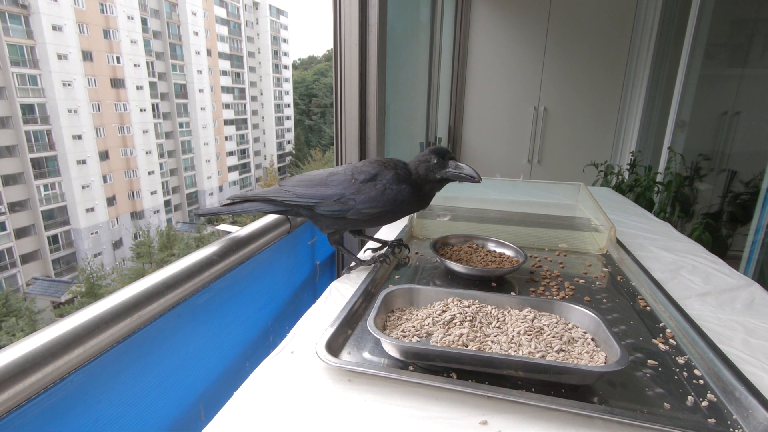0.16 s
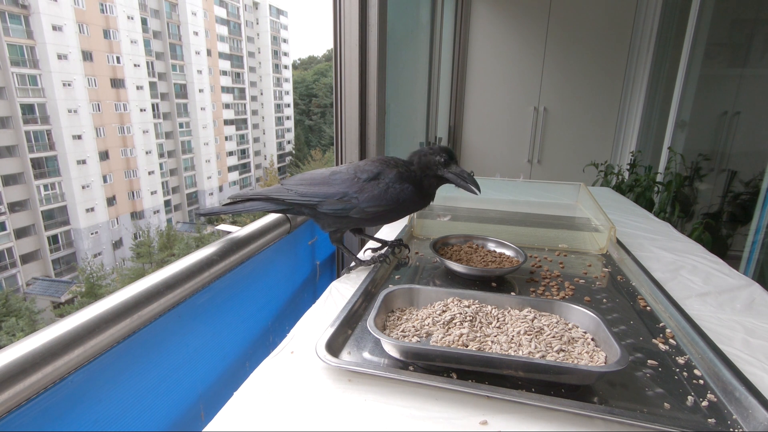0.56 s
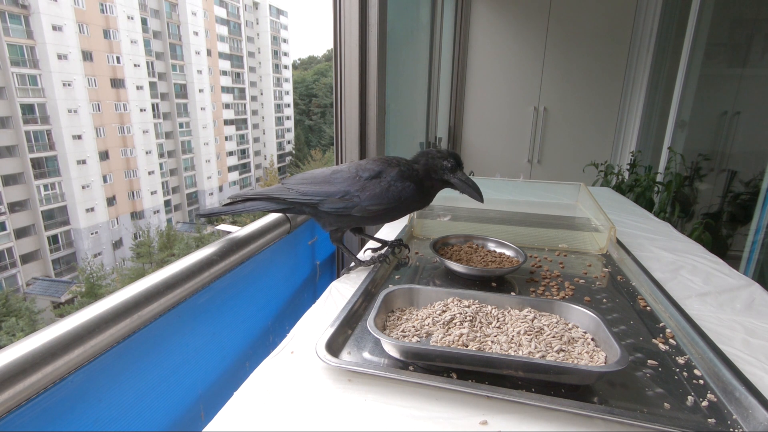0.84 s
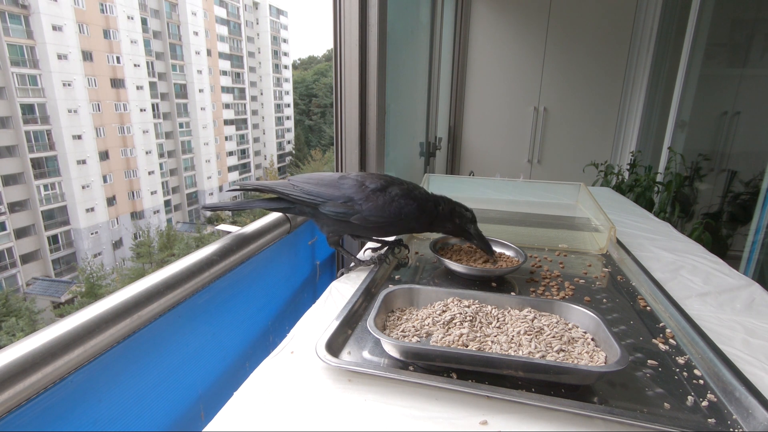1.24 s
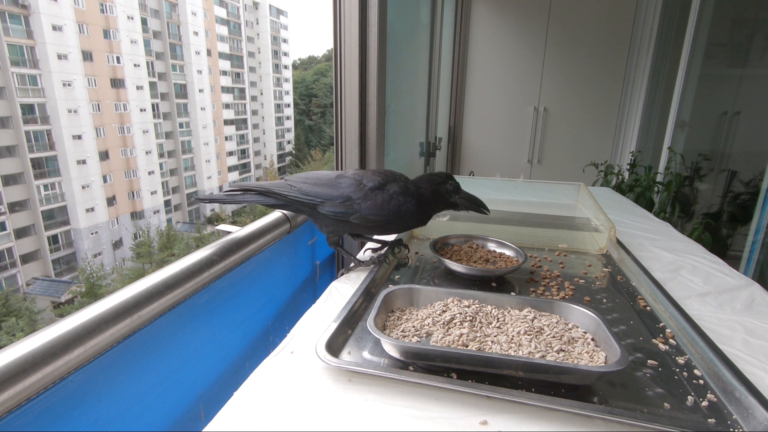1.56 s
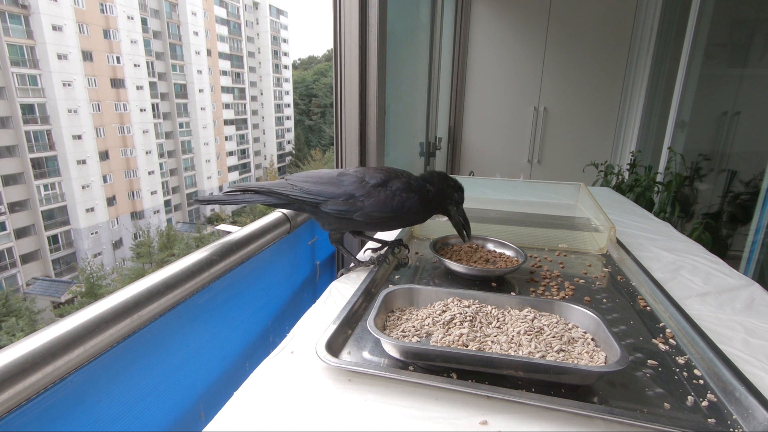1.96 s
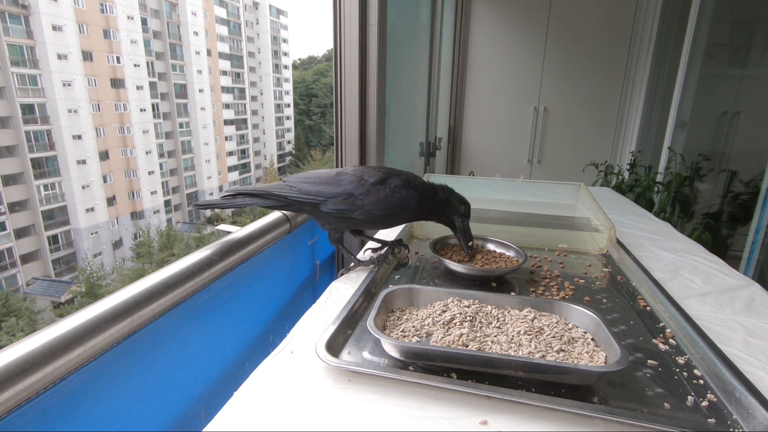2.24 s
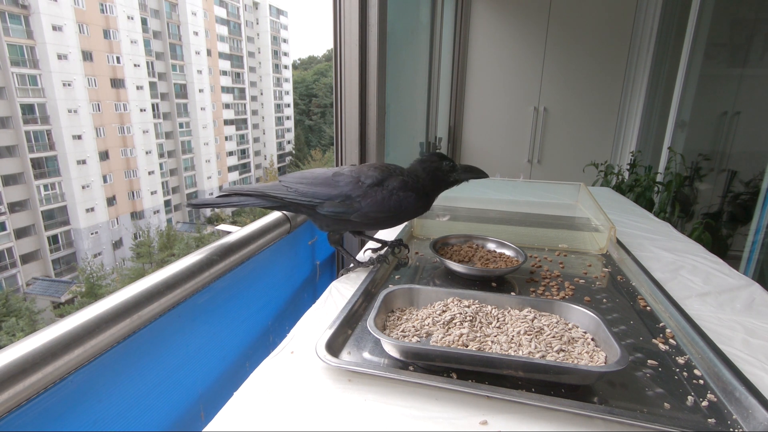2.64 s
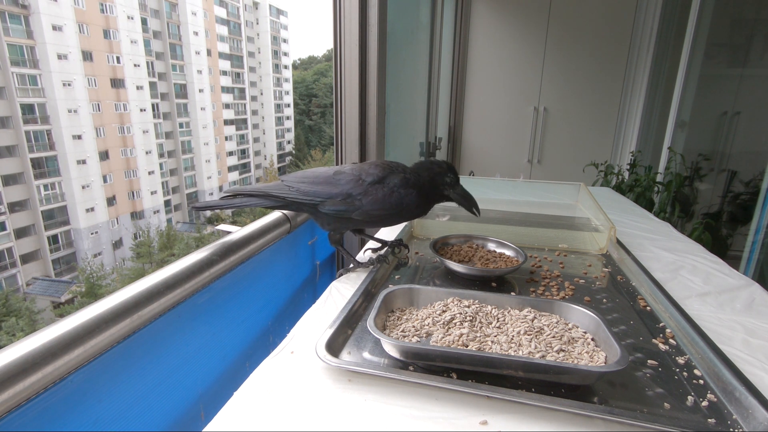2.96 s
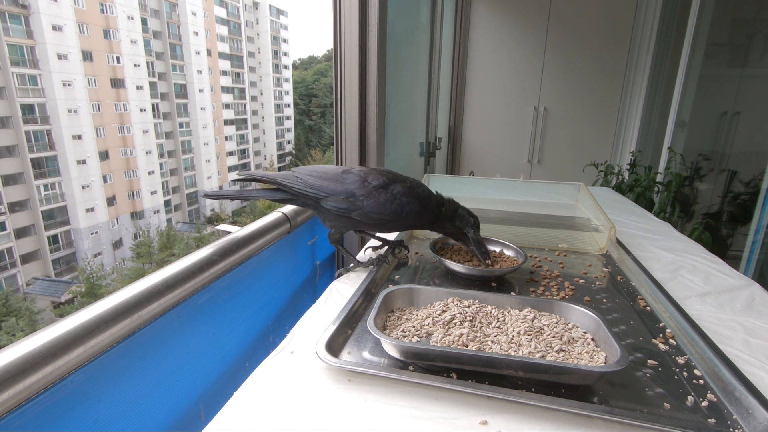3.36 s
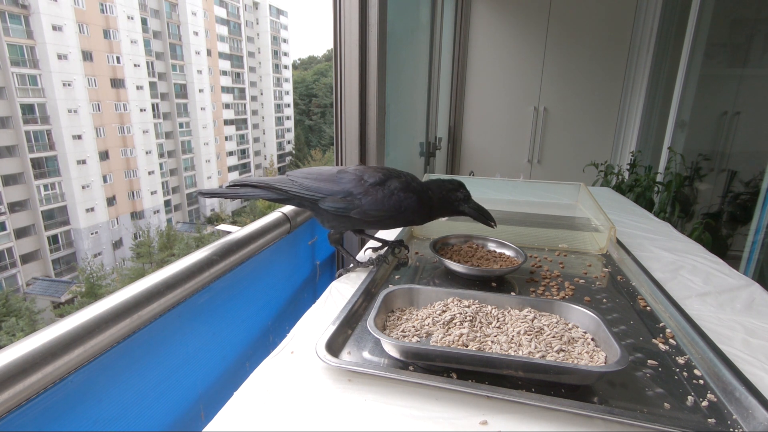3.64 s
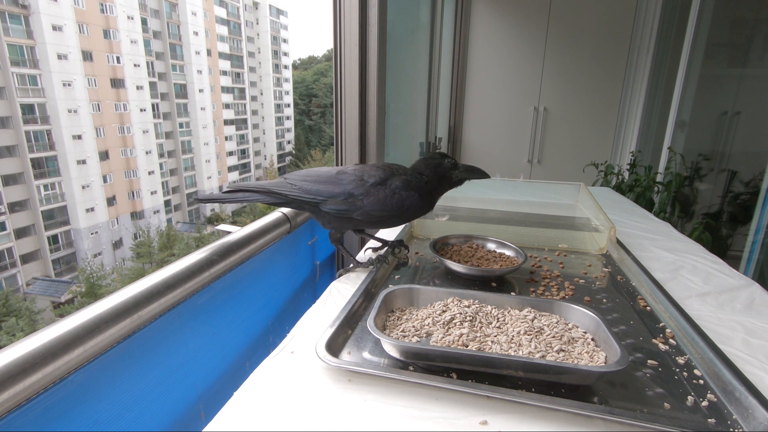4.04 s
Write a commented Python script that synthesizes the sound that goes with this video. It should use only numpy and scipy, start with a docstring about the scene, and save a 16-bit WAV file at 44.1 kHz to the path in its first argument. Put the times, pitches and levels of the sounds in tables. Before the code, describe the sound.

A crow feeds from a steel bowl on a glazed balcony. After a tap on the railing come three short bursts of pecking, with crisp bill clicks, rattling seeds and a thin metallic ring. One sharp, buzzing crack on the railing follows, then lighter clicks and soft thumps from a tray. Distant traffic, a low hum and light wind on the nearby microphone run underneath.

```python
"""Crow at a steel seed bowl

On a glazed balcony a crow's bill stirs seeds, clicks, rings the bowl and cracks on the railing,
which buzzes; glass and walls echo, and the pushed tray thumps. Behind: city traffic, three low
wavering hums, wind at the two microphone ports. The camera housing adds a treble peak between notches."""
import sys
import numpy as np
from scipy import signal
from scipy.fft import rfft, irfft, next_fast_len
from scipy.io import wavfile
from scipy.ndimage import uniform_filter1d, map_coordinates

SR = 44100
rng = np.random.default_rng(int(sys.argv[2]) if len(sys.argv) > 2 else 0)


def to_wav(sig):
    """Store sig (one row per channel, or 1-D mono) as 16-bit WAV at the path in sys.argv[1].

    Samples outside -1..1 are clipped; the rate is SR.
    """
    pcm = np.clip(np.atleast_2d(sig), -1, 1) * 32767
    pcm = np.round(pcm).astype(np.int16)
    wavfile.write(sys.argv[1], SR, pcm.T)  # frames by channels


N = 185543
TIME_S = np.arange(N) / SR

# camera housing response: (frequency [Hz], gain [dB])
HOUSING_GAIN = [(3000, -0.5), (3900, -4), (4350, -21.5), (4800, -4.5), (6000, 11), (7300, 2.5), (8100, -15),
                (8800, -40.5), (9600, -11.5), (12000, -14), (13000, -39), (14000, -24), (15000, -48.5)]
# glass echo of bill and seeds: (frequency [Hz], gain [dB])
GLASS_GAIN = [(400, -27), (1100, -10), (2200, 5.5), (3800, -5), (6000, -10), (12000, -18.5)]
# taps on the railing: (time [s], crack [dB], crack pitch [ratio], loss below mid pitch [dB/oct],
# loss above [dB/oct], pan [dB], buzz pitch [ratio], buzz t60 [s], buzz [dB], rattle [dB], seed jolt [dB])
TAPS = [(0.0857, -30, 1.145, 1.5, 0, -1, 0.89, 0.18, -35.5, -50, -63.5),
        (2.5375, -41, 0.88, -3, 12, 0.5, .8, 0.089, -43, -74, -87),
        (3.3835, -18.5, 1.012, 3, 5, -2, 0.91, 0.11, -28.5, -48, -50.5),
        (3.8882, -41, 1.0, -3, 1.5, -4, 0.87, 0.085, -40.5, -64.5, -79.5)]


def amp(db):
    return 10 ** (np.asarray(db) / 20)


def unit(x):
    return x / np.sqrt(np.mean(x ** 2) + 1e-20)


def pan(db):
    """Stereo gains for a left-minus-right level."""
    return amp(db * np.array([[.5], [-.5]]))


def along(points, hz):
    """Interpolate (Hz, value) points on a log axis."""
    f, v = np.transpose(points)
    return np.interp(np.log(hz + 1), np.log(f + 1), v)


def curves(rows):
    """One value per sample for each column after the time."""
    s, *cols = np.transpose(rows)
    return [np.interp(TIME_S, s, c) for c in cols]


def wobble(rate_hz):
    """Smooth random curve, rate_hz knots a second."""
    return map_coordinates(rng.standard_normal(int(N * rate_hz / SR) + 4), [TIME_S * rate_hz])


def burst(hz, cycles, t):
    """Sine that falls to 1/e in the given cycles."""
    return np.sin(2 * np.pi * hz * t) * np.exp(-t * hz / cycles)


def filtered(x, response, ends="odd"):
    """Apply response(hz); mirrored ends avoid clicks."""
    edge = SR // 4
    x = np.pad(x, [(0, 0)] * (x.ndim - 1) + [(edge, edge)], "reflect", reflect_type=ends)
    m = next_fast_len(x.shape[-1])
    return irfft(rfft(x, m) * response(np.fft.rfftfreq(m, 1 / SR)), m)[..., edge:edge + N]


def shaped(x, spectrum, ends="odd"):
    """Filter by (Hz, dB) points."""
    return filtered(x, lambda hz: amp(along(spectrum, hz)), ends)


def two_ports(three, shared):
    """One common signal with the given share of power, plus one per port."""
    return np.sqrt(shared) * three[0] + np.sqrt(1 - shared) * three[1:]


def port_phase(x, lead):
    """Each port hears each frequency with its own phase."""
    return filtered(x, lambda hz: np.exp(.5j * along(lead, hz) * np.array([[1], [-1]])))


def rush(spectrum, patchy_db):
    """Stereo noise, rms 1, with random gain patches in time and frequency."""
    # (frequency [Hz], left-right correlation [ratio])
    coherence = [(60, 0.95), (140, 0.82), (280, 0.43), (500, 0.47), (900, 0.71), (1850, 0.76), (3600, 0.73),
                 (5500, 0.091), (12000, 0.076)]
    z = signal.stft(rng.standard_normal((2, N + 512)), nperseg=512)[2]
    patches = uniform_filter1d(rng.standard_normal(z.shape[1:]), size=6, axis=0)
    patches = unit(uniform_filter1d(patches, size=14, axis=1))
    pair = signal.istft(z * amp(patchy_db * patches), nperseg=512)[1][:, :N]

    def mid_side_gain(hz):
        angle = np.arccos(along(coherence, hz)) / 2
        return amp(along(spectrum, hz)) * [np.cos(angle), np.sin(angle)]

    mid, side = filtered(pair, mid_side_gain, ends="even")
    return unit(np.array([mid + side, mid - side]))


def hums():
    """Three low sines wandering in pitch and level."""
    # level of each hum: (time [s], level [dB])
    deep_level = [(0.0, -29.5), (0.2, -26), (0.22, -31.5), (0.33, -27.5), (0.62, -33), (0.67, -41),
                  (0.77, -34), (1.08, -30.5), (1.21, -36.5), (1.56, -26), (1.77, -34), (1.83, -24),
                  (1.97, -33.5), (2.0, -37.5), (2.46, -24.5), (2.51, -32), (3.1, -25.5), (3.21, -36.5),
                  (3.34, -24.5), (3.57, -30.5), (3.76, -28.5), (4.04, -30.5), (4.17, -28.5), (4.21, -28)]
    middle_level = [(0.0, -24), (0.13, -56), (0.26, -17.5), (0.29, -51.5), (0.34, -19.5), (0.5, -49),
                    (0.6, -33), (0.87, -43.5), (0.91, -32.5), (1.26, -55.5), (1.4, -24.5), (1.52, -34),
                    (1.63, -20), (1.76, -46), (1.85, -22), (2.04, -56), (2.08, -35), (2.58, -48.5),
                    (2.62, -27.5), (2.69, -41.5), (3.15, -43.5), (3.17, -32.5), (3.49, -50), (3.77, -24),
                    (3.79, -53.5), (4.21, -37.5)]
    upper_level = [(0, -51.5), (.8, -43.5), (1.8, -54.5), (2.5, -46), (2.7, -43.5), (3.2, -38.5),
                   (4.0, -48.5), (4.21, -35)]
    # (time [s], pitch [Hz])
    middle_pitch = [(0, 54.05), (.45, 54.37), (.6, 60.65), (1.3, 60.37), (1.6, 62.52), (1.9, 63.18),
                    (2.8, 61.32), (3.2, 65.84), (3.6, 55.2), (4.21, 54.16)]
    deep_hz, middle_hz, upper_hz = 25.46, curves(middle_pitch)[0], 150.5
    drift, waver_db = 0.0244, 1.5
    out = 0
    for hz, level in ((deep_hz, deep_level), (middle_hz, middle_level), (upper_hz, upper_level)):
        turns = np.cumsum(hz * (1 + drift * wobble(5))) / SR + rng.random()
        rms = amp(curves(level)[0] + waver_db * wobble(11))
        out = out + np.sqrt(2) * rms * np.sin(2 * np.pi * turns)
    return out


def wind():
    """Gusts buffet the ports with low noise."""
    # (time [s], level [dB])
    gusts = [(0.0, -56), (0.14, -35.5), (0.3, -26), (0.53, -41), (0.6, -26), (0.66, -37), (1.8, -31.5),
             (1.86, -26), (2.27, -40), (2.99, -33), (3.07, -54), (3.22, -20.5), (3.3, -45), (3.53, -53),
             (3.76, -27.5), (3.78, -29.5), (3.99, -32), (4.21, -46.5)]
    # (frequency [Hz], density [dB])
    spectrum = [(18, -43), (30, 5.5), (41, -2.5), (65, -1), (97, -6.5), (160, -14.5), (210, -12.5),
                (350, -120)]
    gust_db = curves(gusts)[0] + 1.5 * wobble(8)
    return amp(gust_db) * rush(spectrum, patchy_db=0)


def traffic():
    """Low roar and broad hiss from the street."""
    # (time [s], roar [dB], hiss [dB])
    levels = [(0.0, -37.5, -49.5), (0.3, -39, -49), (0.34, -32.5, -48.5), (0.56, -41, -50),
              (1.01, -36, -49.5), (1.05, -38.5, -49), (2.46, -36.5, -49.5), (2.49, -40, -47),
              (2.79, -36, -48), (4.21, -38.5, -48)]
    # spectra: (frequency [Hz], density [dB])
    roar = [(53, -33.5), (90, -2), (118, -8.5), (140, -5.5), (193, -2.5), (333, -12.5), (367, -15.5),
            (394, -17), (600, -46), (780, -56.5), (1320, -120)]
    hiss = [(300, -11.5), (450, 5.5), (750, 5), (1400, -1.5), (2200, -12), (3500, -22), (6000, -29),
            (10000, -27.5), (16000, -21.5)]
    roar_db, hiss_db = curves(levels)
    return amp(roar_db) * rush(roar, patchy_db=1.5) + amp(hiss_db) * rush(hiss, patchy_db=1.68)


def background():
    """Hums, wind and traffic, stronger on the right."""
    # (frequency [Hz], left minus right [dB])
    balance = [(60, -4), (170, -5), (330, -1.5), (510, -0.5), (860, -4), (1470, -1), (2200, -1.5),
               (7300, -2)]
    return filtered(hums() + wind() + traffic(), lambda hz: pan(along(balance, hz)))


def puffs():
    """Short octave-wide swells of turbulence, mostly at the left port."""
    # (time [s], half-width [s], level [dB], centre [Hz])
    swells = [(0.279, 0.012, -50, 630), (0.321, 0.0098, -49, 725), (0.335, 0.047, -50.5, 690),
              (0.374, 0.021, -51, 744)]
    out = np.zeros(N)
    for s, width_s, db, centre_hz in swells:
        band = lambda hz: np.exp(-(np.log2((hz + 1) / centre_hz) / 0.63) ** 2)
        eddy = unit(filtered(rng.standard_normal(N), band, ends="even"))
        out += amp(db) * np.exp(-((TIME_S - s) / width_s) ** 2) * eddy
    return out * pan(5)


def glazing(x, colour):
    """Strong, dull first echo off the glass, slightly later on the left."""
    delay_s = .0055 + .0001 * np.array([[.5], [-.5]])
    return filtered(x, lambda hz: amp(along(colour, hz)) * np.exp(-2j * np.pi * hz * delay_s))


def balcony(x):
    """Direct sound, wall echoes and a noise tail redrawn every quarter second."""
    # (delay [s], gain [dB])
    walls = [(.008, -21.5), (0.014, -35.5), (0.022, -29.5), (0.027, -34)]
    # (frequency [Hz], t60 [s])
    decay = [(300, 0.57), (1500, 0.35), (4000, 0.075), (10000, 0.22)]
    step, tail_delay_samples, tail_db = SR // 4, 300, -10
    out = x.copy()
    for s, db in walls:
        out[:, round(s * SR):] += amp(db) * x[:, :-round(s * SR)]
    for start in range(0, N, step):
        hz, t, z = signal.stft(rng.standard_normal((2, SR // 2)), SR, nperseg=256)
        tail = signal.istft(z * amp(-60 * t / along(decay, hz)[:, None]), SR, nperseg=256)[1]
        wet = signal.fftconvolve(x[:, start:start + step], tail / np.linalg.norm(tail[0]), axes=1)
        room = out[:, start + tail_delay_samples:]
        room[:, :wet.shape[1]] += amp(tail_db) * wet[:, :room.shape[1]]
    return out


def tray_thumps():
    """The pushed tray gives short low pulses."""
    # (time [s], half-width [s], level [dB], pitch [Hz])
    pushes = [(3.224, 0.0087, -19, 126), (3.702, 0.0055, -19.5, 95), (3.917, 0.0029, -21, 122)]
    out = np.zeros(N)
    for s, width_s, db, hz in pushes:
        t = TIME_S - s
        out += amp(db) * np.exp(-(t / width_s) ** 2) * np.cos(2 * np.pi * hz * t)
    return out * pan(5)


def husk_splash():
    """Husks thrown against the steel: fine bright grains, unrelated at the two ports."""
    # (time [s], level [dB], t60 [s])
    throws = [(1.09, -74, 0.24), (1.19, -52, .2), (2.081, -68, 0.29), (2.286, -59, 0.27), (3.2, -58, 0.34),
              (3.3, -63, .5), (3.38, -38.5, 0.22), (3.885, -70, 0.14)]
    # (frequency [Hz], density [dB])
    spectrum = [(8000, -42), (9500, 4.5), (12000, 9.5), (14000, 5.5), (16000, -12.5)]
    grains_per_s, rise_s = 5000, 0.0033
    grains = (rng.random((2, N)) < grains_per_s / SR) * rng.standard_normal((2, N))
    envelope = np.zeros(N)
    for s, db, t60 in throws:
        age = np.maximum(TIME_S - s, 0)
        envelope += amp(db - 60 * age / t60) * (1 - np.exp(-age / rise_s))
    return envelope * pan(-3) * unit(shaped(grains, spectrum, ends="even"))


def collisions(per_s, spread_db, shared):
    """Random stereo impulses of uneven size."""
    hits = (rng.random((3, N)) < per_s / SR) * rng.standard_normal((3, N))
    size_db = spread_db * np.minimum(rng.exponential(size=(3, N)), 4)
    return two_ports(hits * amp(size_db), shared)


def seeds():
    """Seeds collide, dull bodies and bright husks; each stir or rail jolt rises, holds and settles."""
    # (start [s], hold [s], level [dB], brightness [dB])
    stirs = [(0.785, 0.11, -74, 3.5), (1.062, 0.008, -62.5, -0.5), (1.076, 0.012, -59, -1.5),
             (1.103, 0.018, -58, -1.5), (1.161, 0.072, -60, -2.5), (2.03, 0.047, -56.5, -7),
             (2.076, 0.013, -54.5, 0), (2.083, 0.0067, -55.5, 3.5), (2.186, 0.011, -63, 4.5),
             (2.282, 0.01, -68, 11), (2.322, 0.012, -63, 1.5), (2.446, 0.009, -67.5, 0),
             (2.493, 0.036, -74, -11.5), (3.12, 0.0085, -67, 7), (3.174, .02, -62, -1),
             (3.196, 0.0087, -56.5, 2), (3.21, 0.016, -53, -4), (3.256, 0.013, -64, -0.5),
             (3.3, 0.0067, -55.5, 6), (3.852, 0.012, -75, 7.5), (3.877, 0.0056, -63, 1),
             (4.005, 0.019, -69, -17)]
    # (frequency [Hz], density [dB])
    body_spectrum = [(500, -5), (1200, 2), (2000, 1.5), (3000, -1), (4000, -1.5), (4600, -14.5)]
    husk_spectrum = [(3500, -16.5), (4500, 4.5), (6000, -0.5), (8000, 10.5), (9500, -0.5), (12000, -6.5),
                     (16000, 4.5)]
    attack_s, settle_db_per_s = 0.0019, 206.5
    rest_db, rest_bright_db = -87.5, -13.5
    jolt_hold_s, jolt_bright_db = 0.024, 8
    coarse = collisions(per_s=1700, spread_db=2.9, shared=0.49)
    fine = collisions(per_s=9000, spread_db=4.0, shared=0.41)
    body = unit(shaped(coarse, body_spectrum))
    husk = unit(shaped(fine + 0.12 * coarse, husk_spectrum))
    out = amp(rest_db) * (body + amp(rest_bright_db) * husk)
    jolts = [(s, jolt_hold_s, db, jolt_bright_db) for s, *_, db in TAPS]
    for s, hold_s, db, bright_db in stirs + jolts:
        at = slice(round(s * SR), round(s * SR) + SR // 2)
        age = TIME_S[at] - at.start / SR
        rise = np.clip(age / attack_s, 0, 1) ** 2
        settle_db = settle_db_per_s * np.maximum(age - attack_s - hold_s, 0)
        out[:, at] += rise * amp(db - settle_db) * (body[:, at] + amp(bright_db) * husk[:, at])
    return out


def resonant_noise(modes, pitch):
    """Stereo noise through the rail's resonances, rms 1."""
    noise = two_ports(rng.standard_normal((3, N)), shared=0.7)
    peaks = lambda f: sum(amp(db) / (1 + ((f / pitch - hz) / width) ** 2) for hz, width, db in modes)
    return unit(filtered(noise, peaks, ends="even"))


def rail_buzz():
    """The loose rail buzzes and rattles; the buzz pitch depends on the place of the tap."""
    # (base frequency [Hz], half-width [Hz], level [dB]); the last row rattles
    modes = [(724, 840, -13.5), (1120, 540, -11), (1480, 120, 1), (1800, 200, -7), (4100, 880, 0)]
    lag_s, rise_s, rattle_t60_s = 0.0019, 0.00057, .4
    out = np.zeros((2, N))
    rattle_noise = resonant_noise(modes[-1:], pitch=0.93)
    for s, *_, pitch, t60, buzz_db, rattle_db, _ in TAPS:
        age = np.maximum(TIME_S - s - lag_s, 0)
        buzz = amp(buzz_db - 60 * age / t60) * resonant_noise(modes[:-1], pitch)
        rattle = amp(rattle_db - 60 * age / rattle_t60_s) * rattle_noise
        out += (1 - np.exp(-age / rise_s)) * (buzz + rattle)
    return out


def rail_cracks():
    """Bill on railing: grit, brief modes staggered over about a millisecond, and a glass echo."""
    # (base frequency [Hz], level [dB])
    modes = [(320, -1.5), (750, -5.5), (1100, -11), (1420, -8), (1680, -4.5), (2500, 0), (3400, 6),
             (5900, 6.5), (11800, -18.5), (13900, -0.5)]
    # glass echo of a tap: (frequency [Hz], gain [dB])
    echo_gain = [(400, -19.5), (800, -15.5), (1300, 2.5), (1800, 5.5), (2600, 2.5), (3600, -7),
                 (6000, -8.5), (12000, -16.5)]
    mid_hz, cycles, stagger_s, rise_s = 1580, 2.55, 0.00042, 0.000061
    out, t = np.zeros((2, N + SR)), np.arange(SR // 50) / SR
    for s, db, pitch, below_db, above_db, pan_db, *_ in TAPS:
        noise = rng.standard_normal(len(t))
        grit = np.gradient(uniform_filter1d(noise, size=5)) * np.exp(-t / 0.0029)
        crack = 1.7 * amp(-2 * above_db) * grit
        for (hz, mode_db), late in zip(modes, noise):
            age = np.maximum(t - stagger_s * abs(late), 0)
            loss_db = abs(np.log2(hz / mid_hz)) * (below_db if hz < mid_hz else above_db)
            crack += amp(mode_db - loss_db) * burst(hz * pitch, cycles, age) * (1 - np.exp(-age / rise_s))
        out[:, round(s * SR):][:, :len(t)] += amp(db) * pan(pan_db) * crack
    return out[:, :N] + glazing(out[:, :N], echo_gain)


def bowl():
    """Rim blows ring the steel; close modes beat, the resting bill damps them."""
    # (frequency [Hz], level after the housing [dB], free t60 [s], build-up [s], pan [dB], sign [+/-1])
    modes = [(2998, -4, .15, 0, -5, 1), (4812, -10, .13, 0, -4, 1), (5550, -2.5, .23, .006, 0, 1),
             (5667, -19, .6, 0, -1, 1), (5976.6, -1, .77, .04, -3.5, 1), (5995.8, -9, .5, 0, 7, -1),
             (6594, -9, 1.55, .015, 2.5, 1), (7122.8, 0, .22, 0, -1, 1), (7148, -17, .5, 0, -5, 1),
             (7172, -1, .08, 0, 4, 1), (7350, -17, .7, 0, -3, 1), (8283, -28, .55, 0, -10, 1),
             (9249, -26, .25, 0, -1, 1), (10520, -33, .4, 0, 0, 1)]
    # (time [s], level [dB], damping [1 = free], favoured pitch [Hz], loss an octave off [dB], rise [s])
    blows = [(-.3, -39.5, 1.4, 6600, 17.5, .001), (1.1878, -43.5, 1.02, 6600, -2, 0.0014),
             (3.293, -40.5, 2.3, 3000, 42, 0.0017), (3.244, -42.5, 1.9, 7123, 92, 0.006),
             (3.297, -38, 1.6, 7123, 90.5, 0.0098), (3.3795, -52, 2, 5975, 31, 0.00084)]
    jitters_db = [2.3 * wobble(35) for _ in modes]  # seeds on the steel roughen each mode
    out = np.zeros((2, N))
    for s, db, damping, favoured_hz, loss_db, rise_s in blows:
        at = slice(max(round(s * SR), 0) + 1, round(s * SR) + SR)
        age = TIME_S[at] - s
        for (hz, mode_db, t60, build_s, pan_db, sign), jitter_db in zip(modes, jitters_db):
            octaves_off = abs(np.log2(hz / favoured_hz))
            start_db = db + mode_db - loss_db * octaves_off ** .5 - along(HOUSING_GAIN, hz)
            decay = amp(start_db + jitter_db[at] - 60 * age * damping / t60)
            rise = 1 - np.exp(-age / (rise_s + build_s / damping ** 2))
            out[:, at] += sign * pan(pan_db) * rise * decay * np.sin(2 * np.pi * hz * age)
    return out


def bill_clicks():
    """Bill among the seeds: crunchy knock, tray thud, bright gritty edge, and a glass echo."""
    # (time [s], knock [dB], knock [Hz], edge [dB], edge [Hz], pan [dB])
    clicks = [(0.2226, -46, 1840, -50, 6160, -1.5), (1.0655, -47, 2930, -52.5, 6250, 2.5),
              (1.0714, -39, 3020, -58, 6000, 1.5), (1.084, -34, 1795, -49, 6000, 2),
              (1.089, -38.5, 2000, -39, 5967, 1.5), (1.1108, -21, 2800, -30.5, 6200, 0),
              (1.119, -45.5, 2500, -42, 5800, -3), (1.1237, -36, 2100, -43.5, 5650, 0),
              (1.133, -41.5, 2090, -53, 5770, 1.5), (1.137, -33.5, 2010, -43.5, 5600, -2.5),
              (1.158, -34.5, 2350, -43.5, 6160, 1.5), (1.1872, -49, 2700, -26.5, 7200, -2),
              (1.189, -24, 2700, -27.5, 5810, 2), (1.1907, -32, 1650, -37.5, 5400, 0),
              (1.3761, -36, 2940, -52, 6900, 1.5), (1.71, -63.5, 2500, -60.5, 6200, 0.5),
              (2.0562, -21, 1896, -52.5, 6200, -1.5), (2.080, -54, 2030, -39, 6285, -2),
              (2.085, -37, 1900, -40, 6300, -0.5), (2.092, -44, 2290, -38, 6500, 2),
              (2.097, -26, 2250, -34.5, 5950, 1), (2.191, -31.5, 1910, -67, 6200, -1),
              (2.285, -31, 2060, -37.5, 6000, 0.5), (2.2905, -42.5, 2020, -43.5, 7800, -0.5),
              (2.335, -32, 2150, -53.5, 6260, 6.5), (2.3375, -32, 1880, -40, 6300, -3),
              (2.344, -36, 2000, -57.5, 6200, 0), (2.454, -42.5, 2430, -51.5, 6140, -0.5),
              (2.515, -50.5, 2300, -53, 6300, -2.5), (2.5505, -49, 2660, -63.5, 6200, 2),
              (2.555, -42, 3000, -54.5, 6370, -1.5), (3.181, -46.5, 2391, -57, 6290, 0),
              (3.198, -40.5, 1085, -53, 6030, -3.5), (3.204, -39, 2690, -43, 6180, -11.5),
              (3.222, -36.5, 1560, -44, 5670, -6), (3.238, -48.5, 1680, -55.5, 6030, 0),
              (3.26, -33, 1180, -44.5, 6900, -7), (3.2644, -28.5, 1545, -49, 6236, 0.5),
              (3.2803, -35.5, 1700, -44, 7000, 4), (3.284, -48.5, 2180, -58.5, 6500, -3),
              (3.31, -30.5, 1680, -47, 5970, 3.5), (3.318, -43, 2470, -47.5, 5193, 0),
              (3.331, -54.5, 2020, -48, 5100, -2), (3.861, -45.5, 2370, -50.5, 6330, 5.5),
              (3.8805, -40.5, 2410, -53, 6270, 2.5), (3.8935, -31.5, 863, -51, 7200, -1.5)]
    # rim's effect on the direct knock, bill deep in the bowl: (from [s], to [s], gain [dB])
    shading = [(1.05, 1.2, -4), (2.02, 2.4, -9), (3.17, 3.34, 2.5), (3.85, 3.885, -2)]
    knock_cycles, edge_cycles, thud_hz, thud_db = 2.2, 3, 930, -25
    direct, to_glass = np.zeros((2, 2, N + SR))
    t = np.arange(SR // 50) / SR
    thud = amp(thud_db) * burst(thud_hz, knock_cycles, t)
    for s, knock_db, knock_hz, edge_db, edge_hz, pan_db in clicks:
        noise = rng.standard_normal(len(t))
        crunch = (uniform_filter1d(noise, 9) - uniform_filter1d(noise, 30)) * np.exp(-t / 0.0038)
        grit = uniform_filter1d(noise[::-1], 4) * np.exp(-t / 0.0043)
        knock = amp(knock_db) * (burst(knock_hz, knock_cycles, t) + 0.7 * crunch + thud)
        edge = amp(edge_db) * (burst(edge_hz, edge_cycles, t) + 0.56 * grit)
        contact = pan(pan_db) * (1 - np.exp(-t / 0.00057))  # the horn of the bill gives a little
        shade_db = sum(db for start, end, db in shading if start < s < end)
        at = slice(round(s * SR), round(s * SR) + len(t))
        direct[:, at] += contact * (amp(shade_db) * knock + edge)
        to_glass[:, at] += contact * (knock + edge)
    return direct[:, :N] + glazing(to_glass[:, :N], GLASS_GAIN)


def scene():
    """Street and crow reach the ports with different phase."""
    # (frequency [Hz], left port lead [rad])
    street_lead = [(20, 0), (60, 0.31), (150, 0.47), (300, 0), (750, 5), (1250, 1.5), (1900, 1.5),
                   (2600, 1.5), (3500, 0.2)]
    crow_lead = [(300, -1.9), (1250, 0.95), (1850, 0.88), (2600, 0.88), (6500, -0.99), (10000, -0.36)]
    stir = seeds()
    pecking = bill_clicks() + rail_cracks() + stir + glazing(stir, GLASS_GAIN)
    crow = port_phase(balcony(pecking) + bowl() + rail_buzz(), crow_lead)
    backdrop = port_phase(background() + tray_thumps(), street_lead)
    return backdrop + puffs() + crow + husk_splash()


def record(dry):
    """Housing colour, short end fade, camera band limit."""
    fade_s, top_hz = .004, 15100
    fade = np.clip(TIME_S[::-1] / fade_s, 0, 1)
    return filtered(shaped(dry, HOUSING_GAIN) * fade, lambda hz: hz < top_hz)


dry = scene()
out = record(dry)
to_wav(out)
```